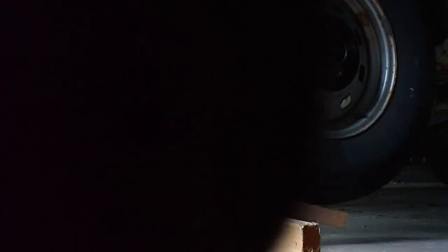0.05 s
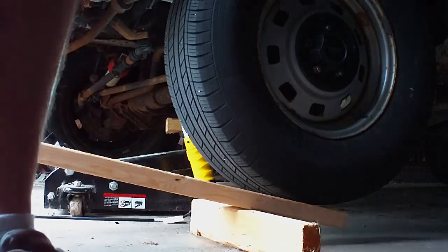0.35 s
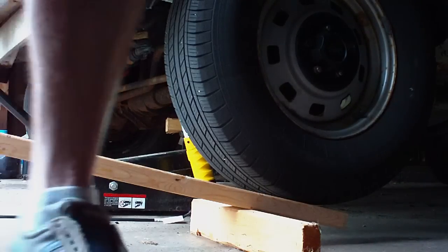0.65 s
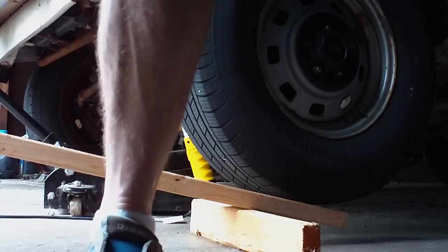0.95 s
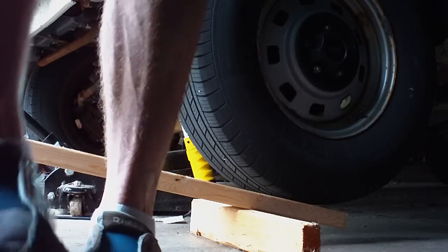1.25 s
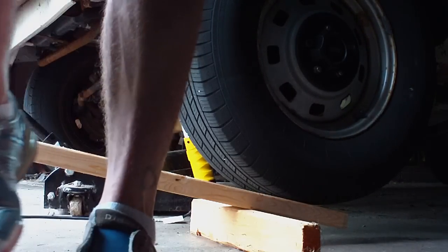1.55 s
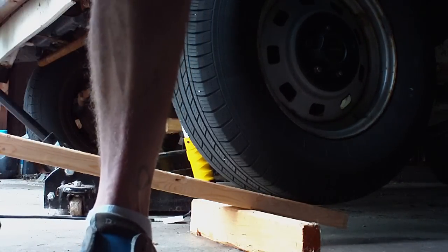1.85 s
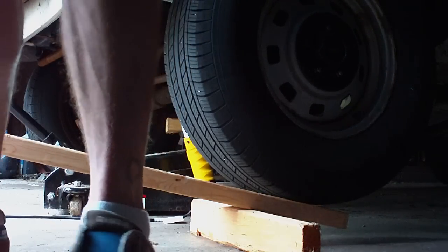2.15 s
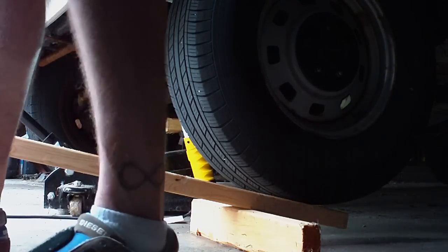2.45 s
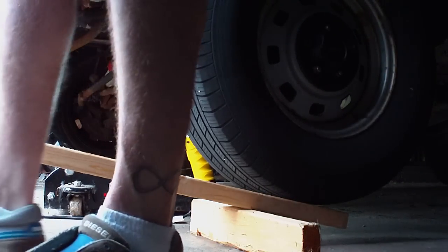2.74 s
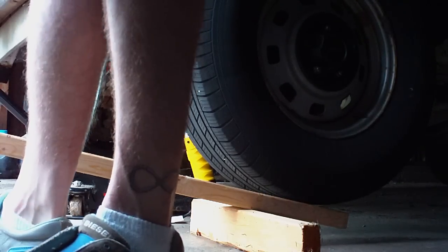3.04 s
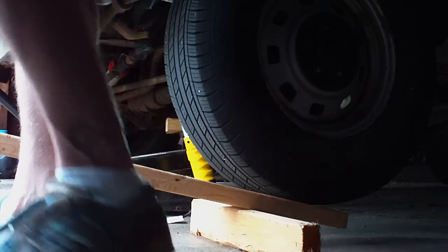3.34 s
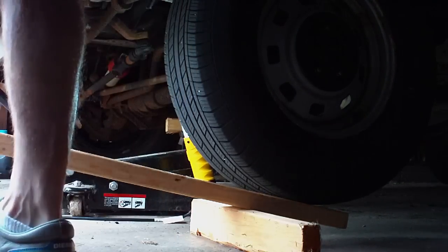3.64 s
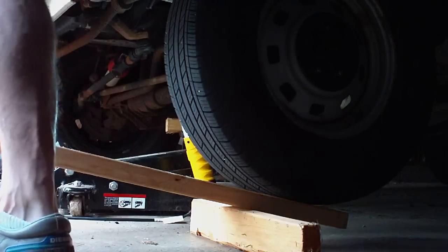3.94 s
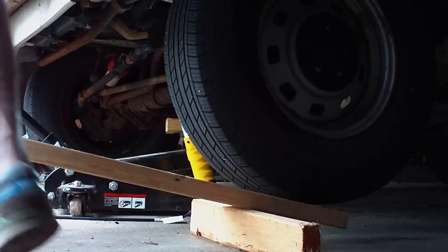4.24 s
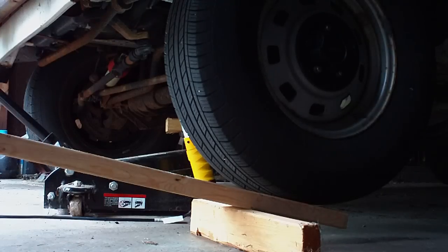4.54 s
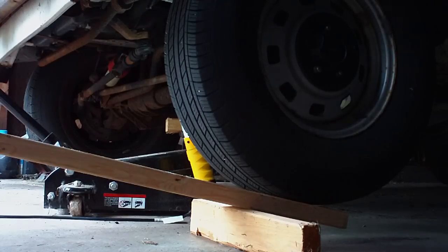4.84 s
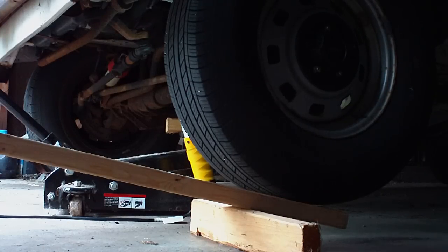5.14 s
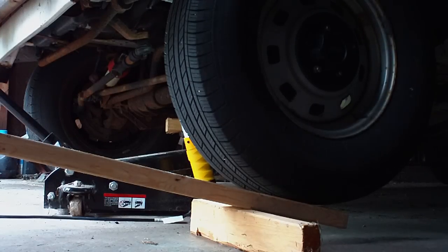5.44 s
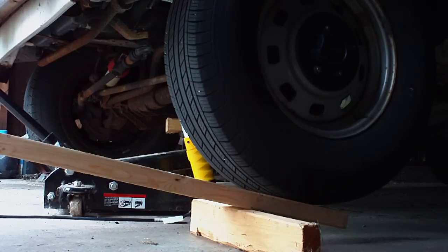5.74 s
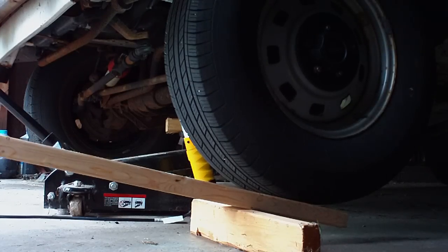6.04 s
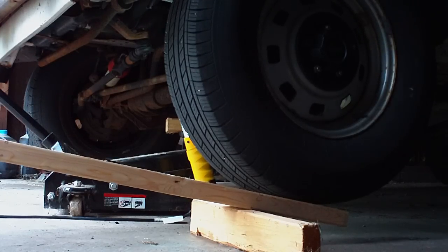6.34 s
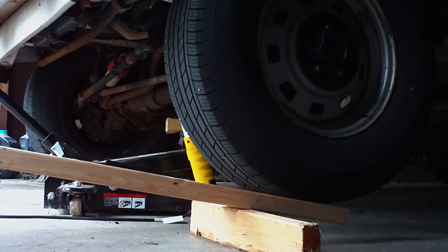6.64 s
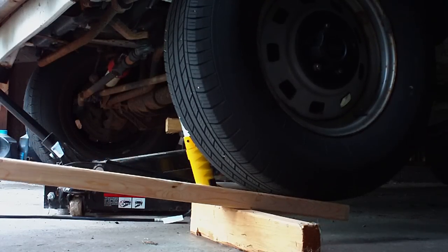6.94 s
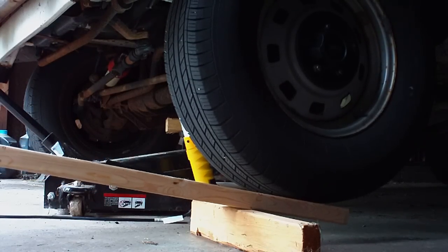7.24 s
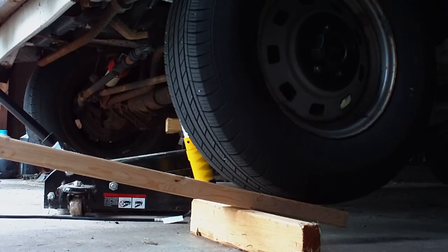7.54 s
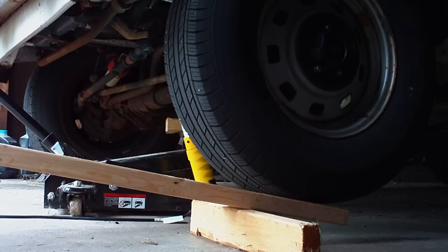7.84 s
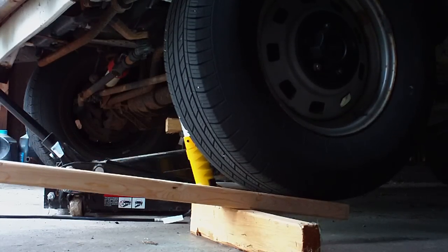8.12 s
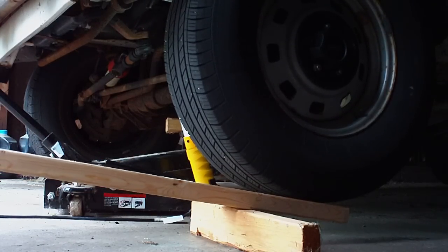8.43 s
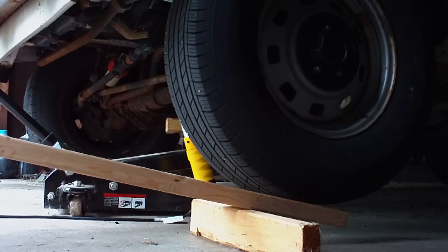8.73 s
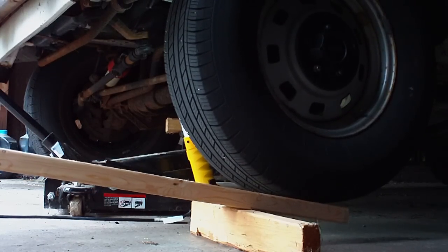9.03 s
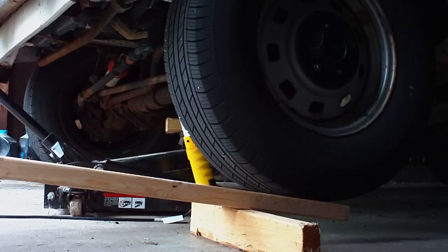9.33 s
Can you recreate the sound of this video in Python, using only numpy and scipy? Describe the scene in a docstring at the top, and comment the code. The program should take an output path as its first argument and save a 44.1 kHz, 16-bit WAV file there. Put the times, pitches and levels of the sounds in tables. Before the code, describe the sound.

Shoes scuff gritty concrete and a wooden plank knocks, creaks and clunks under a car wheel, over a low garage hum and hiss.

```python
"""A plank levers a raised car wheel in a quiet garage, heard on one microphone with a short room tail.
Trainers scuff the gritty concrete as someone steps up and bumps the plank; it knocks as it takes load.
The wheel lifts with a wooden creak and a soft tyre thud, then drops back with a steel clunk.
Behind it a motor hums under room air and microphone hiss; far off, traffic swells and fades."""
import sys
import numpy as np
from scipy import signal
from scipy.fft import rfft, irfft, next_fast_len
from scipy.io import wavfile
from scipy.ndimage import map_coordinates

SR = 44100
rng = np.random.default_rng(int(sys.argv[2]) if len(sys.argv) > 2 else 0)


def store_pcm(level_fs):
    """Save levels as 16-bit WAV."""
    pcm = np.round(np.clip(level_fs, -1, 1) * 32767).astype(np.int16)
    wavfile.write(sys.argv[1], SR, np.atleast_2d(pcm).T)


N = 422478

# knocks of plank, heels and soles: start_s, level_db, pitch_hz, t60_s, contact_s, crack_db, room_db
KNOCKS = [(1.3112, -19.5, 280, 0.021, 0.0012, -6.5, -8.5), (1.333, -27, 420, .014, .001, 1, -12),
          (1.343, -24, 340, .016, .001, -13, -8), (1.3819, -15.5, 230, 0.015, 0.00087, -6, -14),
          (1.391, -18, 200, .014, .001, -9, -16), (1.3982, -23, 260, .016, 0.0011, -0.5, -7.5),
          (1.4040, -14, 206, 0.044, 0.0016, -6, -18), (1.4175, -20.5, 422, 0.02, 0.0012, -5, -11),
          (1.9455, -16.5, 373, 0.025, .001, -20, -18), (2.2522, -20, 950, .02, 0.00065, -17, -14),
          (2.3813, -5, 282, 0.0072, 0.001, -22.5, -13), (3.3123, -25, 300, 0.015, 0.0014, -0.5, -10),
          (3.3187, -21, 1020, 0.024, 0.00085, -11, -23), (4.1754, -8, 350, .018, .0012, -20.5, -9.5),
          (4.6572, -11.5, 355, 0.019, 0.0015, -30, -13), (5.2519, -10, 435, 0.013, 0.00055, -9, -12.5),
          (6.0806, -7.5, 313, 0.011, 0.0012, -27, -12)]
# the plank creaking on its block: start_s, length_s, level_db, pitch_ratio, upper_mode_db
CREAKS = [(6.849, 0.051, -33, 0.95, -2), (8.682, 0.033, -34, 0.9, -15), (9.224, 0.013, -35, 0.96, -8)]
# pushes on the plank that rock the wheel: start_s, length_s, thud_db, pitch_sink_s
PUSHES = [(6.846, 0.11, -25, 0.015), (8.08, 0.11, -31, 0.028), (8.637, 0.13, -30, .02),
          (9.156, 0.075, -27.5, 0.034)]
# a shoe on the plank, then the wheel's joints: start_s, level_db, pitch_ratio, low_mode_t60_s, rattle_db
CLUNKS = [(3.312, -26, 0.94, 0.049, 2), (7.4494, -13, 0.99, 0.039, -4.5), (8.2065, -23, 1.02, 0.02, -1.5),
          (9.3885, -18.5, 1.004, 0.035, -18)]
# modes of a clunk's bright ring and its duller thump: pitch_hz, level_db, t60_s
BRIGHT_MODES = [(1113, 1.5, 0.047), (2010, -16, 0.045), (3170, -11, 0.03), (4760, -19, .02),
                (5780, -22, .03)]
THUMP_MODES = [(211, -11.5, 0.13), (341, -13, 0.19), (541, -15, 0.15), (680, -12, 0.057)]
# soles on concrete: start_s, rise_s, release_s, level_db, grit_pitch_ratio, rubber_db, room_db
SCUFFS = [(0.542, 0.0071, 0.0084, -25.5, 0.99, -31, -10), (0.85, 0.017, 0.045, -38, 0.94, -17, -4),
          (1.054, 0.0088, 0.009, -29, 0.98, 0.5, -11), (1.22, 0.045, 0.08, -38, 0.94, -6, -11),
          (1.366, .011, .008, -41, 0.37, 3, -9), (1.679, 0.011, 0.014, -35.5, 0.9, -12, -5),
          (2.204, 0.038, 0.03, -29, 1.03, 1.5, -7.5), (2.379, 0.0083, 0.016, -29, 0.96, -2.5, -4.5),
          (3.303, 0.011, 0.0088, -28.5, 0.99, -4, -3), (4.338, 0.02, .045, -35.5, 0.95, -15, -5),
          (4.655, 0.016, 0.041, -39.5, 0.95, -9, -3)]
# the loudest snaps of grit underfoot: start_s, level_db
GRIT_SNAPS = [(0.547, -25), (0.5746, -23), (1.0648, -19), (1.0727, -30), (1.229, -23), (1.4708, -23.5),
              (2.232, -26), (2.2533, -22.5), (2.2578, -19.5), (2.268, -26), (2.406, -22), (3.3207, -32),
              (5.254, -25)]
# colours of a knock's crack, rolling grit, snapping grit and dragged rubber: frequency_hz, level_db
CRACK_SPECTRUM = [(150, -7), (500, 5.5), (760, 0), (1020, 10), (1280, -16), (1500, -7), (3500, -23),
                  (7000, -26)]
GRIT_SPECTRUM = [(300, -21.5), (1500, -5), (2200, -9), (3100, -4), (4000, -2.5), (5300, 2), (6500, -0.5),
                 (7500, -17.5), (11000, -13), (13000, -45.5)]
SNAP_SPECTRUM = [(300, -4), (1200, -4.5), (2200, -3), (3200, 1.5), (5500, 2.5), (6700, -5.5), (7500, -18),
                 (12000, -37)]
RUBBER_SPECTRUM = [(100, -18.5), (400, -2.5), (750, -7.5), (965, 4), (1200, -5), (1480, 2), (2100, -16),
                   (2700, -7), (3100, 3), (3600, -13.5), (7000, -33.5)]
# motor and mains tones: pitch_hz, rms_db, wander_hz
HUM_TONES = [(43.6, -52.5, 0.19), (58.55, -31.5, 0.088), (86.6, -47.5, 0.37), (102.3, -40, 0.24),
             (122.4, -53.5, .05), (153, -55.5, 0.22), (205, -52, 1)]
# room rumble, room air, distant tyre roar and microphone hiss: frequency_hz, density_db_per_hz
RUMBLE_SPECTRUM = [(8, -74.5), (19, -68), (26, -57.5), (36, -66.5), (55, -55.5), (72, -65.5), (95, -55),
                   (112, -65.5), (132, -61.5), (185, -66), (215, -65), (250, -70), (330, -71.5),
                   (450, -97.5)]
AIR_SPECTRUM = [(200, -87), (400, -73), (620, -72), (760, -76.5), (950, -74), (1120, -74), (1260, -83.5),
                (1450, -78.5), (2200, -84), (4000, -105)]
ROAR_SPECTRUM = [(150, -87), (400, -71), (620, -67), (950, -65.5), (1250, -75.5), (1700, -75.5),
                 (3000, -95)]
HISS_SPECTRUM = [(100, -78), (1000, -77.5), (3000, -76.5), (6000, -76.5), (6600, -79), (7000, -81),
                 (7300, -106.5)]
# vehicles passing in the distance: loudest_s, gain_db
PASSES = [(1.2, -2.5), (6.1, -12)]
# reverberation of the garage: frequency_hz, t60_s
GARAGE_DECAY = [(100, 0.29), (500, 0.21), (1200, 0.21), (7000, 0.089)]
# the low rub within a tyre thud: frequency_hz, level_db
TYRE_SPECTRUM = [(30, 0.5), (110, 4.0), (280, -5.5), (500, -15.5), (1100, -23.5), (2500, -32.5)]


def knocks():
    """Loaded wood, heels and soles are heavily damped: each knock is a few cycles and a short crack."""
    out, t = np.zeros(N), clock(SR // 3)
    for start_s, db, hz, t60, contact_s, crack_db, room_db in KNOCKS:
        body = -1.6 * ring(t, hz, t60, attack=contact_s)
        crack = amp(crack_db) * swell(t, length_s=0.0071) * unit(noise(CRACK_SPECTRUM, len(t)))
        add(out, start_s, amp(db) * in_garage(body + 0.77 * crack, room_db))
    return out


def plank_creaks(slip_count):
    """The loaded plank sticks and slips unevenly; each slip rings two wood modes, slightly detuned."""
    slips_per_s, contact_s = 240, 0.00037
    sharp_share, settle_s = 0.14, 0.0083  # the first slips ring sharp, then settle
    out, t = np.zeros(N), clock(SR // 3)
    for start_s, length_s, db, pitch, upper_db in CREAKS:
        slips = np.zeros(len(t))
        for k, (late, force, low, high) in enumerate(rng.standard_normal((slip_count, 4))):
            slip_pitch = pitch * (1 + sharp_share * np.exp(-k / slips_per_s / settle_s))
            lower = ring(t, hz=1002 * slip_pitch * np.exp(0.013 * low), t60=0.023, attack=contact_s)
            upper = ring(t, hz=1520 * slip_pitch * np.exp(0.026 * high), t60=0.017, attack=contact_s)
            slip = amp(1.4 * force) * (lower + amp(upper_db) * upper)
            add(slips, (k + 0.29 * late) / slips_per_s, slip)
        add(out, start_s, in_garage(amp(db) * swell(t, length_s) * unit(slips), room_db=-21.5))
    return out


def rocking_wheel():
    """The thud sinks in pitch as the tyre gives; the tread drags and the wheel sways on its spring."""
    start_hz, end_hz, tread_db = 304, 117.3, -24
    sway_hz, sway_db = 26.8, -34.5
    out, t = np.zeros(N), clock(SR // 2)
    for start_s, length_s, thud_db, sink_s in PUSHES:
        hz = end_hz + (start_hz - end_hz) * np.exp(-t / sink_s)
        tone = sine(np.cumsum(hz) / SR)
        rub = unit(noise(TYRE_SPECTRUM, len(t)))
        tread = amp(tread_db) * unit(noise(RUBBER_SPECTRUM, len(t)))
        sway = sine(rng.normal(sway_hz, 2.3) * t + rng.random())
        add(out, start_s, amp(thud_db) * swell(t, length_s) * (0.49 * tone + 0.74 * rub + tread))
        add(out, start_s, amp(sway_db) * swell(t, 1.9 * length_s) * sway)
    return out


def ringing_clunks():
    """Short ringing clunks: a shoe bumps the plank first, then the wheel's joints clunk."""
    low_mode_hz, low_mode_db = 1040, 0.5  # beats with the main bright mode just above it
    out, t = np.zeros(N), clock(SR // 3)
    for start_s, db, pitch, low_t60, rattle_db in CLUNKS:
        rattle = amp(rattle_db) * swell(t, length_s=0.0099) * unit(noise(GRIT_SPECTRUM, len(t)))
        bright = strike(t, BRIGHT_MODES + [(low_mode_hz, low_mode_db, low_t60)], pitch)
        thump = amp(-6) * strike(t, THUMP_MODES, pitch)
        add(out, start_s, amp(db) * in_garage(bright + thump + 0.34 * rattle, room_db=-10))
    return out


def shoe_scuffs():
    """Soles roll crackling grit, lower when coarser; the rubber rasps most at full pressure."""
    grains_per_s = 4500
    out, t = np.zeros(N), clock(SR // 3)
    for start_s, rise_s, release_s, db, pitch, rubber_db, room_db in SCUFFS:
        pressure = np.minimum(t / rise_s, 1) * np.exp(-np.maximum(t - rise_s, 0) / release_s)
        grains = rng.standard_normal(len(t)) * (rng.random(len(t)) < grains_per_s / SR)
        clumps = grit_clumps(len(t))
        grit = unit(filtered(grains * clumps, lambda hz: amp(along(GRIT_SPECTRUM, hz / pitch))))
        rubber = amp(rubber_db) * pressure * unit(noise(RUBBER_SPECTRUM, len(t)) * clumps)
        add(out, start_s, in_garage(amp(db) * pressure * (grit + rubber), room_db))
    return out


def grit_snaps(t60):
    """Grit snaps under a sole or the plank in a brief, broad burst."""
    out, t = np.zeros(N), clock(SR // 3)
    for start_s, db in GRIT_SNAPS:
        snap = amp(db - 60 * t / t60) * unit(noise(SNAP_SPECTRUM, len(t)))
        add(out, start_s, in_garage(snap, room_db=-5.5))
    return out


def sole_swish(start_s, length_s, band_count):
    """A sole swishes off the floor, its noise rising from band to band as the contact patch shrinks."""
    start_hz, end_hz, width_octaves = 1020, 3420, 0.25
    out, t = np.zeros(N), clock(SR // 3)
    progress = np.minimum(t / length_s, 1)
    rub = 0
    for k, centre_hz in enumerate(np.geomspace(start_hz, end_hz, band_count)):
        white = rng.standard_normal(len(t))
        band = filtered(white, lambda hz: np.exp(-(np.log2((hz + 1) / centre_hz) / width_octaves) ** 2))
        power_share = np.maximum(1 - abs((band_count - 1) * progress - k), 0)
        rub = rub + unit(band) * np.sqrt(power_share)
    swish = amp(-36.5) * np.sin(np.pi * progress) * grit_clumps(len(t)) * rub
    add(out, start_s, in_garage(swish, room_db=-7))
    return out


def grit_clumps(size):
    """Grit lies unevenly under the sole, so the level flickers."""
    return amp(2.5 * wobble(per_s=228, size=size))


def motor_hum():
    """Motor and mains tones, each wandering slightly in pitch and level."""
    hum = 0
    for hz, db, wander_hz in HUM_TONES:
        turns = np.cumsum(hz + wander_hz * wobble(per_s=3)) / SR + rng.random()
        hum = hum + amp(db + 0.63 * wobble(per_s=4.3)) * sine(turns)
    return hum


def room_tone():
    """The air of the garage: a low rumble and a soft rush, both slightly unsteady."""
    rumble = noise(RUMBLE_SPECTRUM) * amp(1.2 * wobble(per_s=2.7))
    air = noise(AIR_SPECTRUM) * amp(0.29 * wobble(per_s=4.8))
    return rumble + air


def distant_traffic():
    """Each vehicle's tyre roar comes into earshot quickly and recedes slowly; their powers add."""
    approach_db_per_s, recede_db_per_s = 25, 2
    t = clock(N)
    power = amp(-14.5) ** 2  # steady roads further off
    for loudest_s, db in PASSES:
        away_db = np.maximum(approach_db_per_s * (loudest_s - t), recede_db_per_s * (t - loudest_s))
        power = power + amp(db - away_db) ** 2
    return noise(ROAR_SPECTRUM) * np.sqrt(power) * amp(0.65 * wobble(per_s=5.1))


def microphone_hiss():
    """The microphone's own smooth, steady noise."""
    return noise(HISS_SPECTRUM)


def in_garage(sound, room_db):
    """Direct sound plus a diffuse tail, different for each spot in the room; the treble dies first."""
    hz, t, bands = signal.stft(rng.standard_normal(SR // 2), SR, nperseg=256)
    decay = amp(-60 * t / along(GARAGE_DECAY, hz)[:, None])
    tail = signal.istft(bands * decay, SR, nperseg=256)[1]
    tail *= 1 - np.exp(-(clock(len(tail)) / 0.007) ** 2)  # reflections build up
    return sound + amp(room_db) * signal.fftconvolve(sound, tail / np.linalg.norm(tail))[:len(sound)]


def strike(t, modes, pitch):
    """Modes struck together, each at a slightly random level."""
    return sum(amp(db + rng.normal(0, 1)) * ring(t, hz * pitch, t60, attack=0.0023)
               for hz, db, t60 in modes)


def ring(t, hz, t60, attack):
    """One mode that builds up during the contact and dies away."""
    return np.sin(2 * np.pi * hz * t) * amp(-60 * t / t60) * (1 - np.exp(-(t / attack) ** 2))


def swell(t, length_s):
    """A push that peaks a third of the way through and tails off."""
    u = 3 * t / length_s
    return u * np.exp(1 - u)


def noise(spectrum, size=N):
    """Noise with the given density in dB per Hz."""
    return filtered(rng.standard_normal(size) * np.sqrt(SR / 2), lambda hz: amp(along(spectrum, hz)))


def filtered(x, response):
    """x shaped by a gain that depends on frequency."""
    size = next_fast_len(x.shape[-1] + 8192)
    return irfft(rfft(x, size) * response(np.fft.rfftfreq(size, 1 / SR)), size)[..., :x.shape[-1]]


def wobble(per_s, size=N):
    """A smooth random curve with per_s knots a second."""
    return map_coordinates(rng.standard_normal(int(size * per_s / SR) + 4), [clock(size) * per_s])


def along(points, hz):
    """Interpolate (frequency_hz, value) points on a log frequency axis."""
    frequencies, values = np.transpose(points)
    return np.interp(np.log(hz + 1), np.log(frequencies + 1), values)


def add(track, start_s, sound):
    part = track[max(round(start_s * SR), 0):][:len(sound)]
    part += sound[:len(part)]


def sine(turns):
    return np.sqrt(2) * np.sin(2 * np.pi * turns)  # rms of 1


def unit(x):
    return x / np.sqrt(np.mean(x ** 2) + 1e-20)


def amp(db):
    return 10 ** (np.asarray(db) / 20)


def clock(size):
    return np.arange(size) / SR


def scene():
    """One microphone in the garage feeds both channels."""
    background = motor_hum() + room_tone() + distant_traffic() + microphone_hiss()
    plank_and_wheel = knocks() + plank_creaks(slip_count=80) + ringing_clunks() + rocking_wheel()
    shoes = shoe_scuffs() + grit_snaps(t60=0.0086) + sole_swish(start_s=4.31, length_s=0.05, band_count=7)
    mono = plank_and_wheel + shoes + background
    return np.array([mono, mono])


def record(dry):
    """The microphone channel opens after a moment of silence and cuts off the high treble."""
    open_s, top_hz = 0.072, 7350
    opened = np.clip((clock(N) - open_s) / 0.003, 0, 1)
    return filtered(dry * opened, lambda hz: np.clip((top_hz - hz) / 200 + 0.5, 0, 1))


dry = scene()
out = record(dry)
store_pcm(out)
```